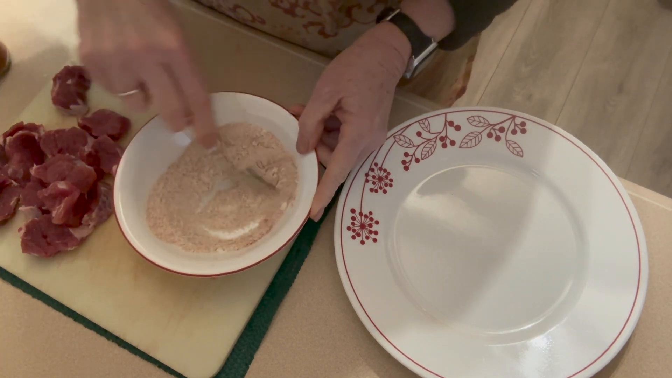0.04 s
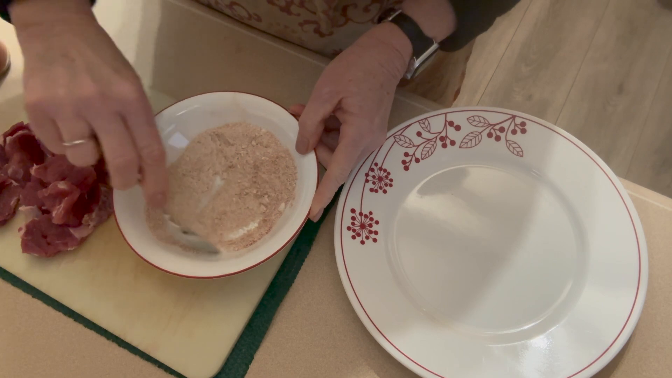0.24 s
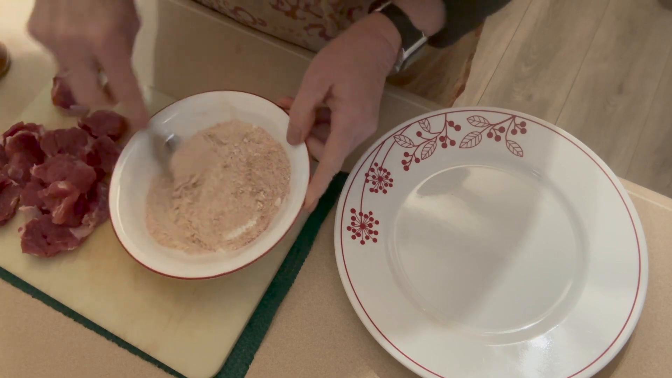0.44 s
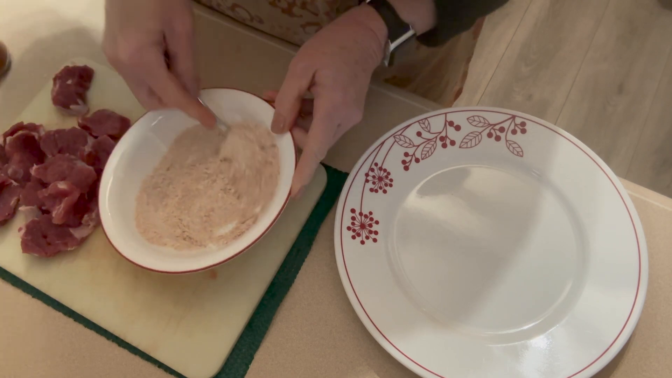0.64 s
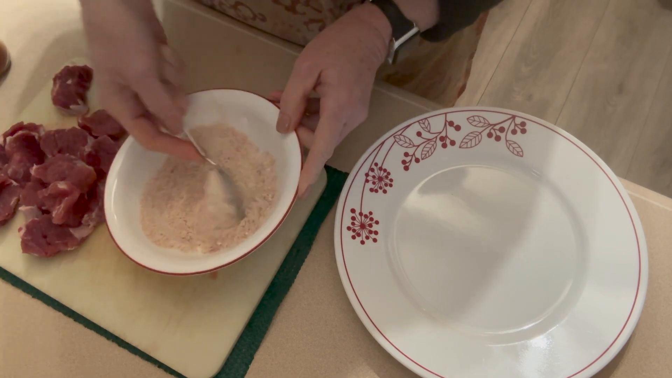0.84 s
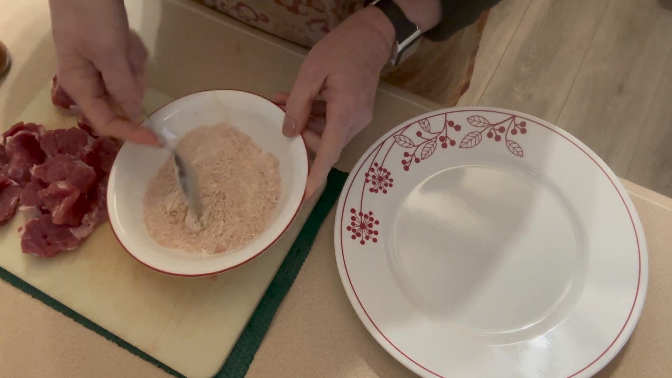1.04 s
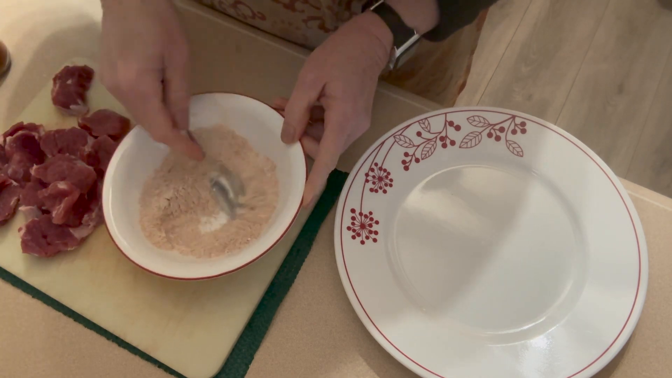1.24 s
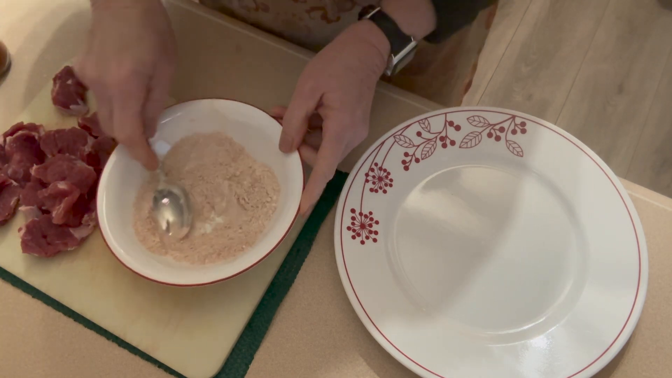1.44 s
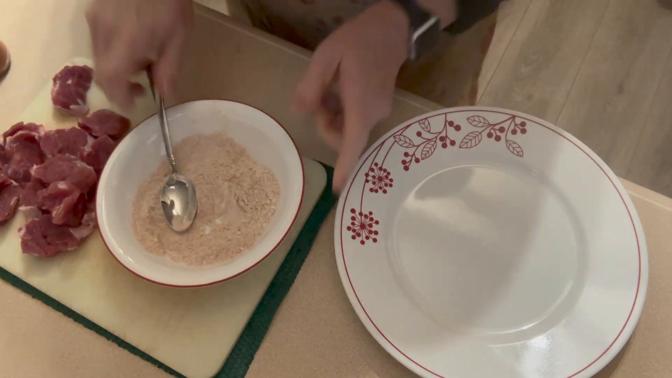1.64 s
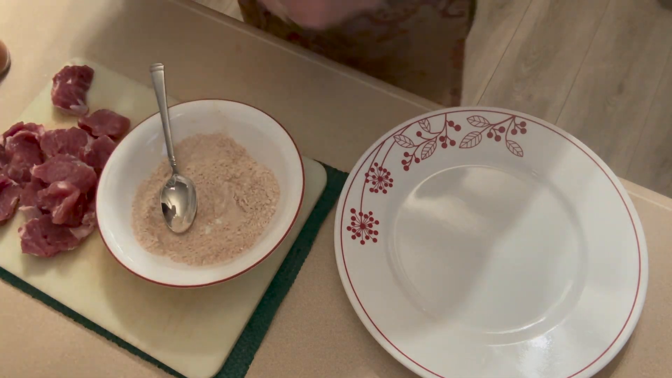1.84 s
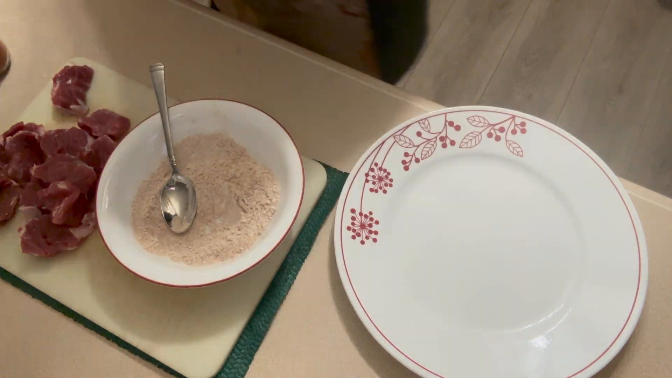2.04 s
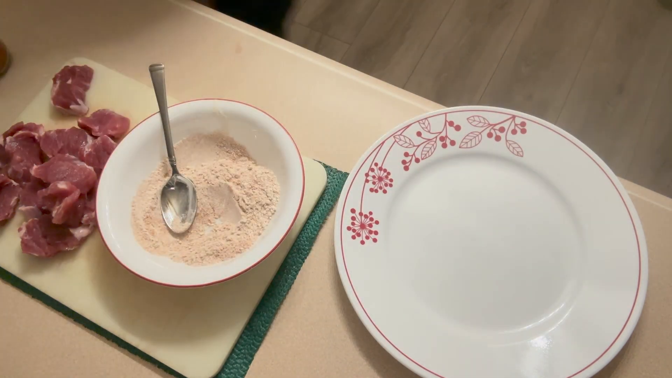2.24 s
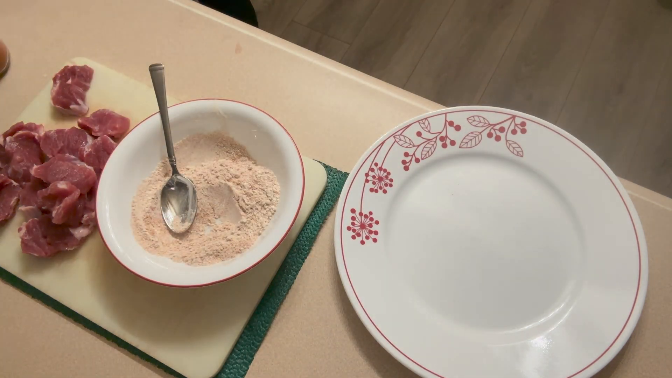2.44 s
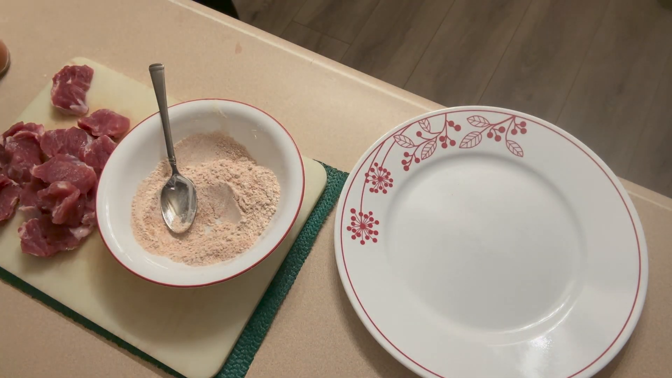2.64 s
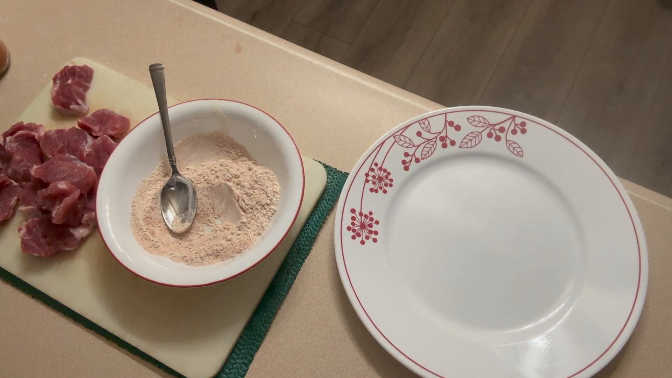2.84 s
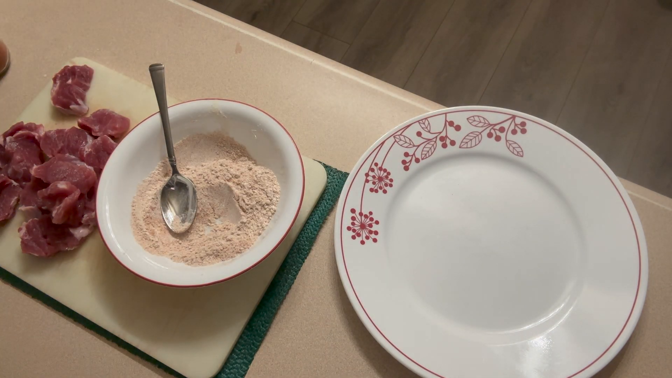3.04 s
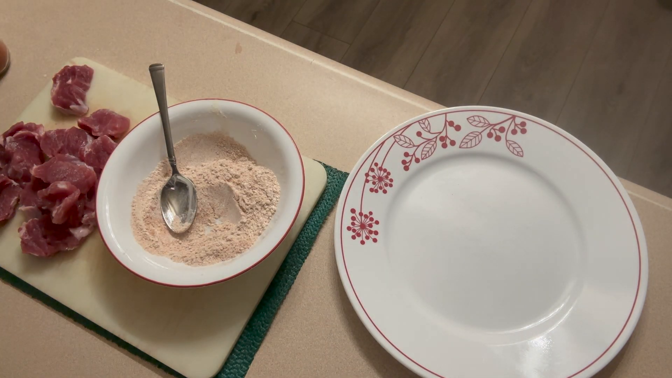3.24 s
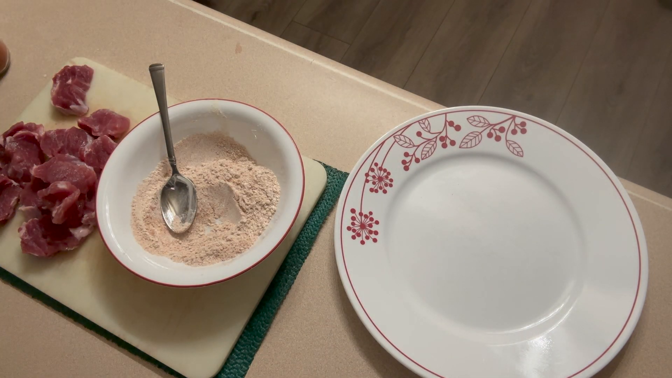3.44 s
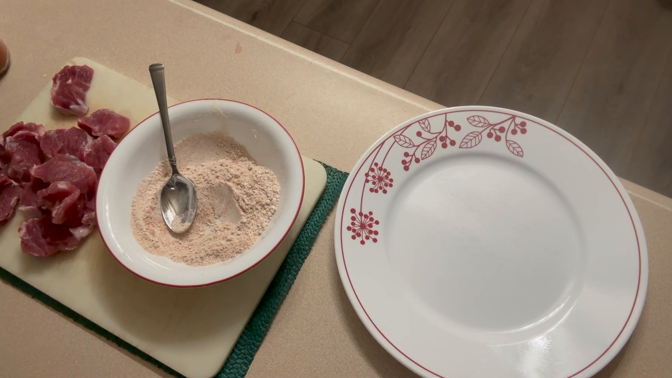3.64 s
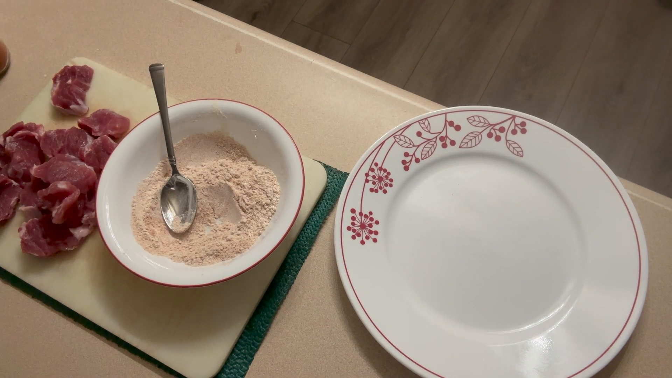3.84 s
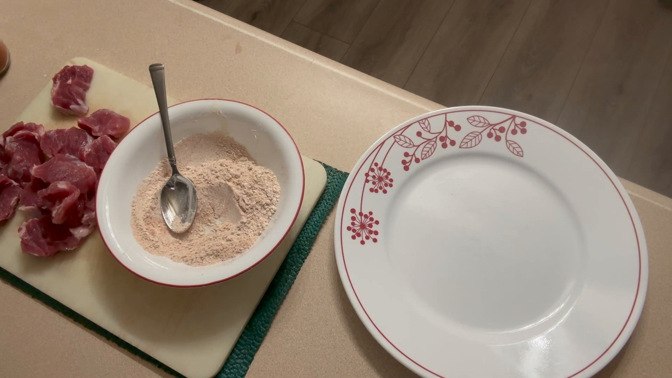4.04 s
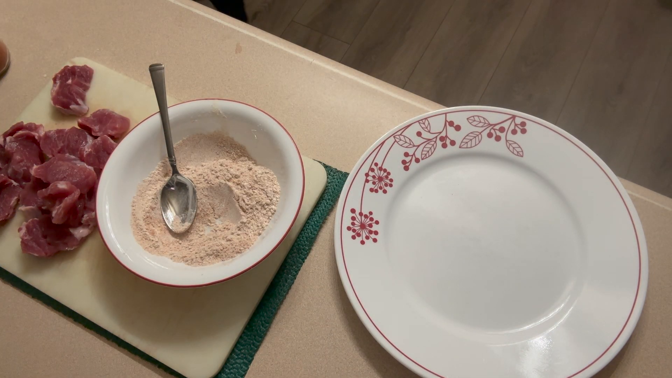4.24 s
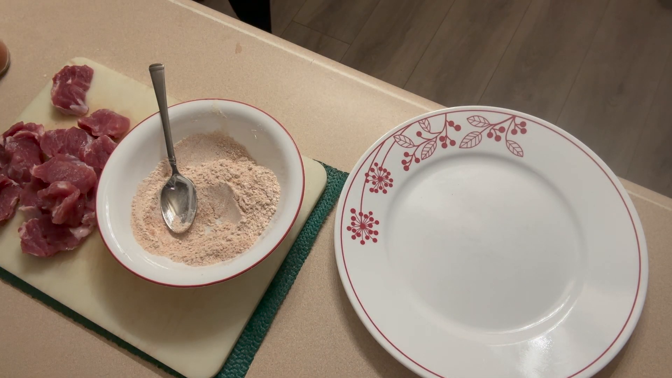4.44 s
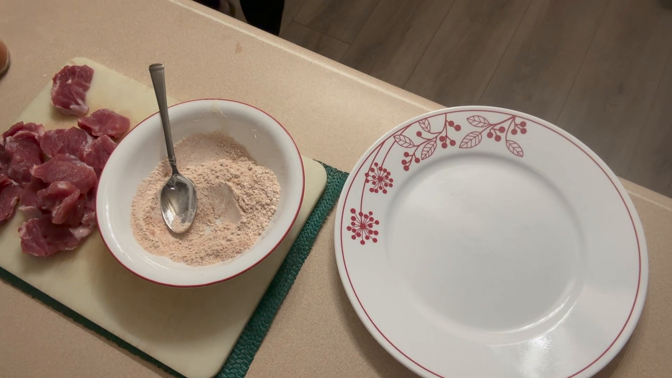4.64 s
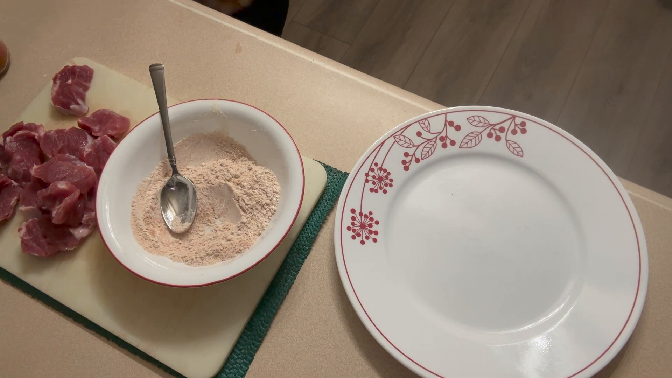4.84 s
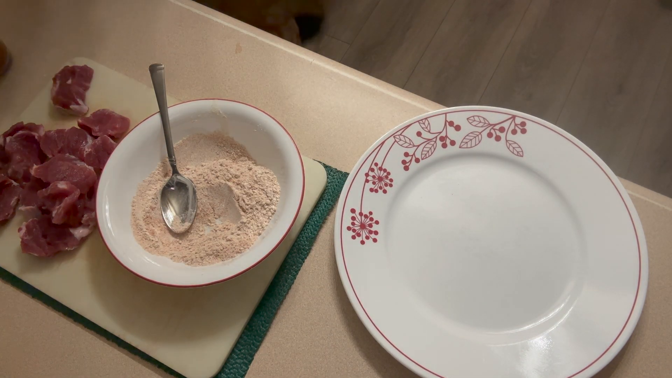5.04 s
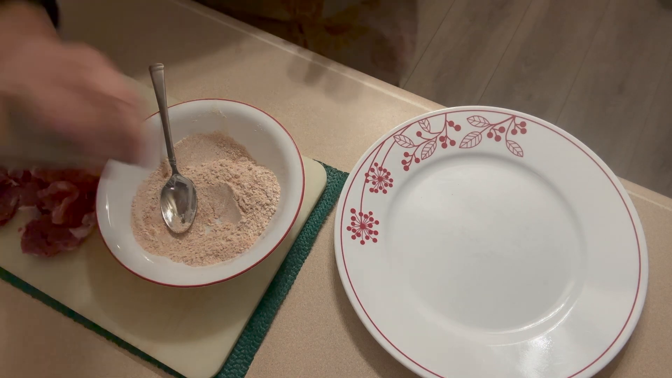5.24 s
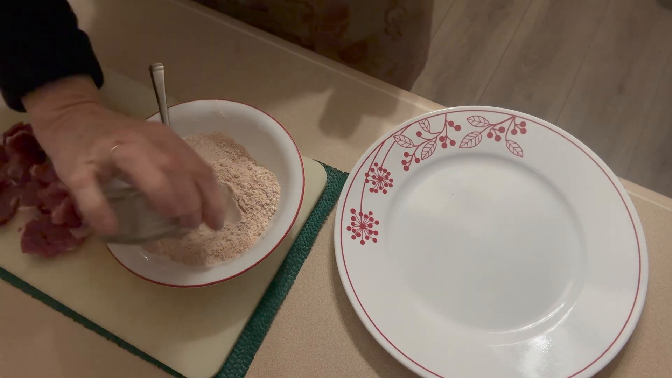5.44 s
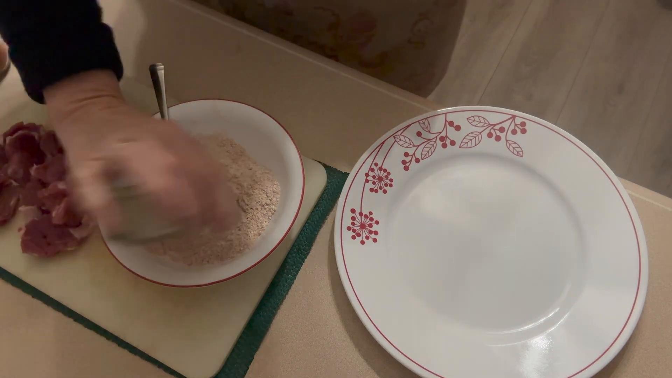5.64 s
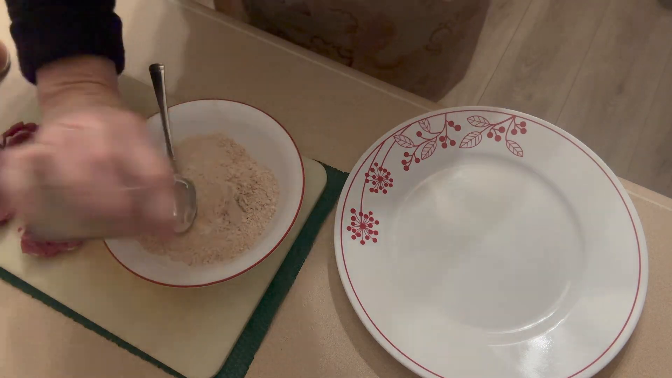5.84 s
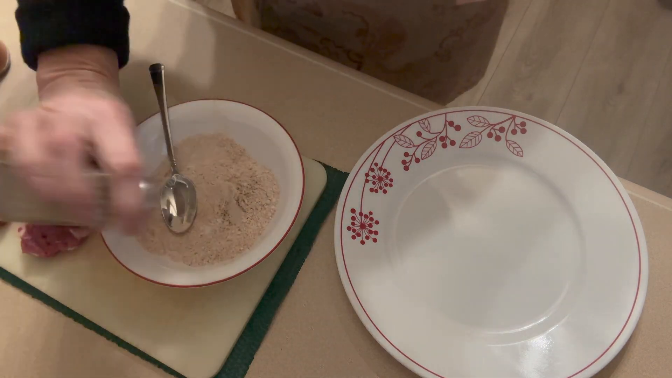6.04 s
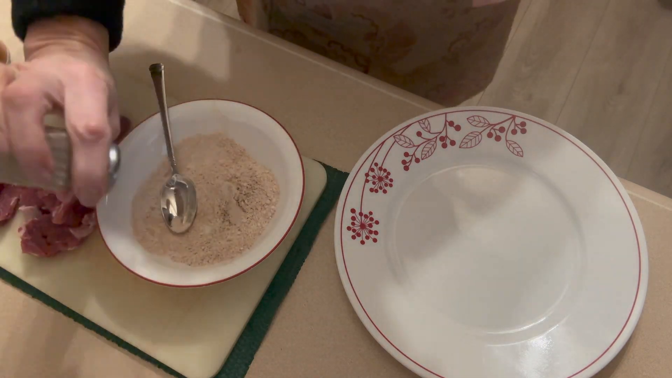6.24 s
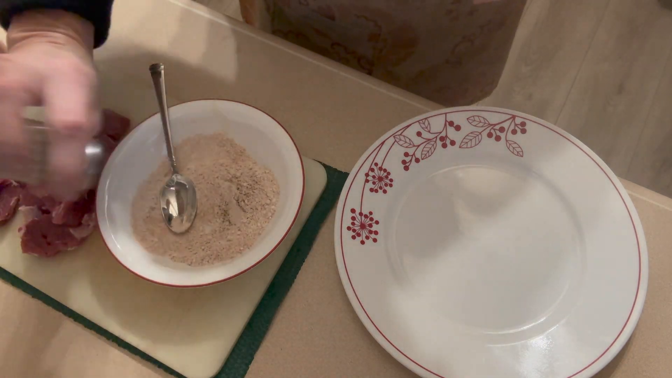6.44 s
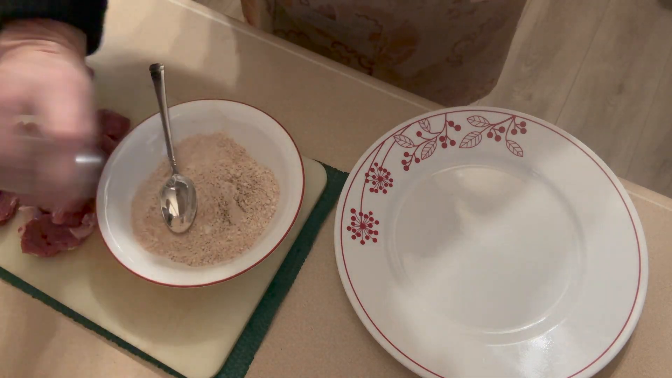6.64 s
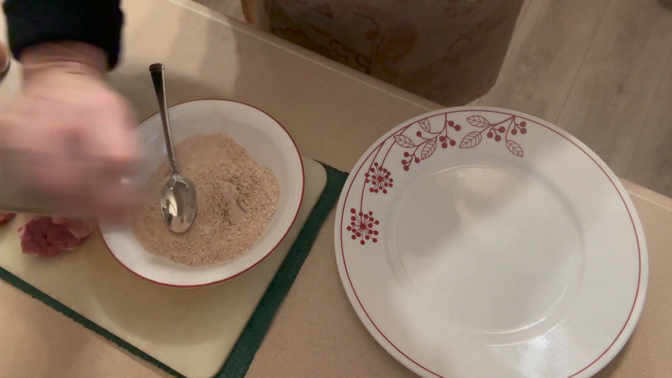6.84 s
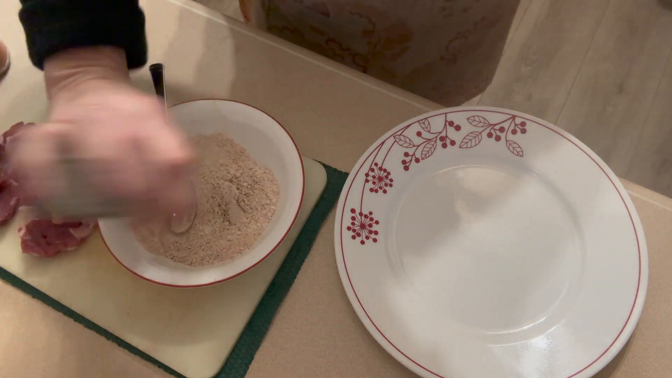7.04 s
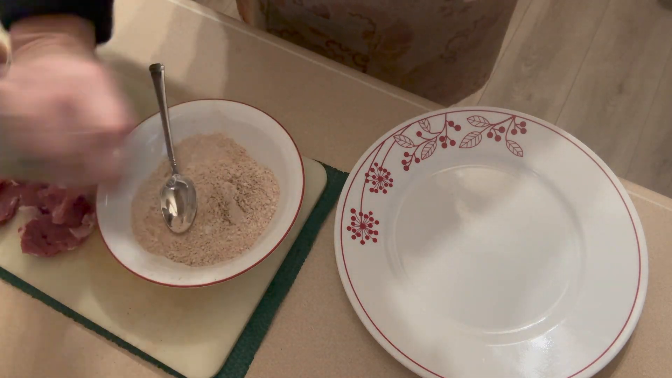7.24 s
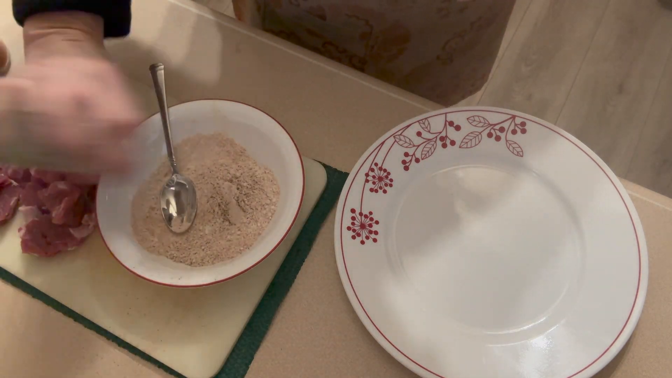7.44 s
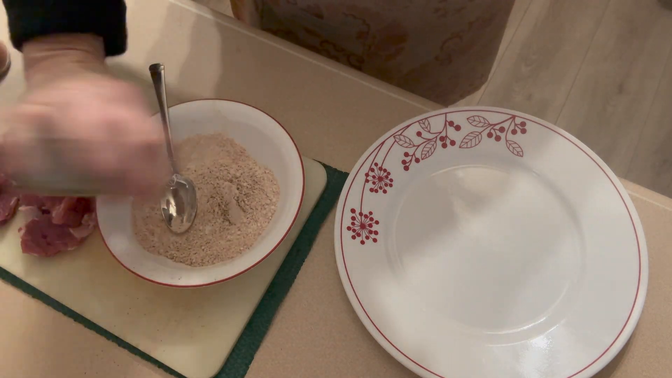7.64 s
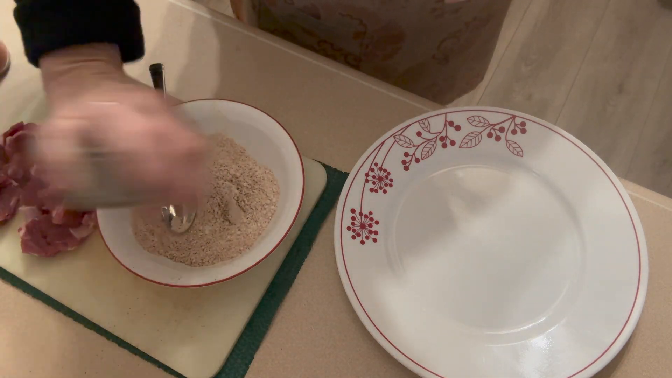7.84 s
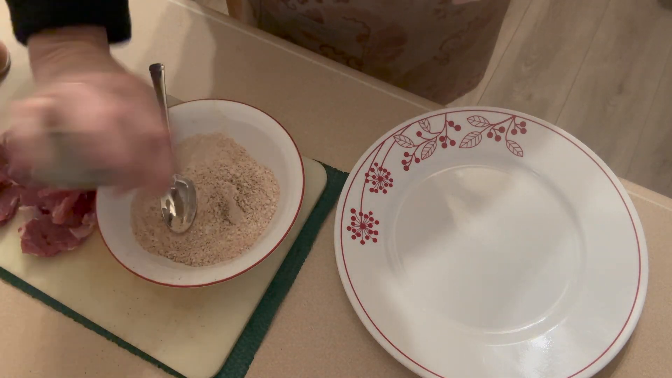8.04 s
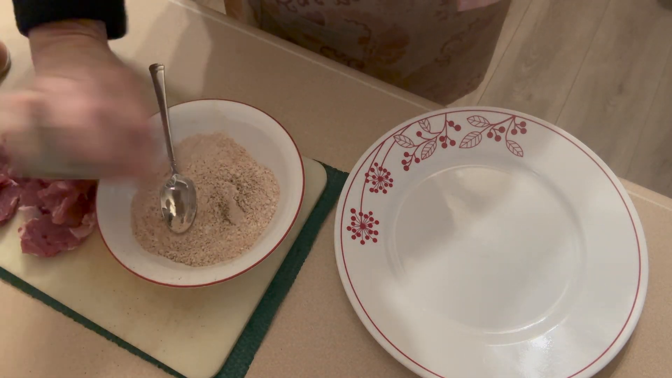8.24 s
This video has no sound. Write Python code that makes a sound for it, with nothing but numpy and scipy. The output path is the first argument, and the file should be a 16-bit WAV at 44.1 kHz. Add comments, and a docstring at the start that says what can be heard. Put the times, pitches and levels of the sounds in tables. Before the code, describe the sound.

In a small home kitchen with a low fridge hum, a spoon hisses through dry flour and clinks on a ceramic bowl, close and slightly left. It drops on the rim with a bright bouncing ring. Clothes rustle and soft steps thud while a jar and cap knock in the distance. Then a spice shaker, near the microphone, is shaken steadily to the end.

```python
"""In a kitchen, a spoon scrapes dry flour round a hand-held bowl, clinks on it and is dropped on the rim.
The cook's clothes rustle and steps thud; a jar and its cap knock across the room, then spice is shaken near by.
Flour, cloth and spice are shaped noise and random grains; bowl, spoon, cap and glass are struck ringing modes;
a fridge hums below it all as broad rumble with narrow noisy drones."""
import sys
import numpy as np
from scipy import signal
from scipy.fft import rfft, irfft
from scipy.io import wavfile

SR = 44100
rng = np.random.default_rng(int(sys.argv[2]) if len(sys.argv) > 2 else 0)


def waveform_to_disk(signal):
    """Save audio, clipped to [-1, 1], as 16-bit WAV at the path in sys.argv[1]."""
    frames = np.transpose(np.atleast_2d(signal))
    scaled = np.clip(frames, -1, 1) * 32767
    samples = np.round(scaled).astype(np.int16)
    wavfile.write(sys.argv[1], SR, samples)


N = 366471


def amp(db):
    """dB to gain."""
    return 10 ** (np.asarray(db) / 20)


def rms_one(x):
    """Scale to rms 1."""
    return x / np.sqrt(np.mean(x ** 2) + 1e-20)


def in_time(rows):
    """A gate that fades within 30 ms beyond the ends of a curve, then its columns at every sample."""
    s, *columns = np.transpose(rows)
    t = np.arange(N) / SR
    gate = np.interp(t, [s[0] - .03, s[0], s[-1], s[-1] + .03], [0, 1, 1, 0])
    return [gate] + [np.interp(t, s, column) for column in columns]


def at_hz(points, hz):
    """Read a spectrum on a log-frequency axis."""
    point_hz, values = np.array(points).T
    return np.interp(np.log(hz), np.log(np.maximum(point_hz, 1)), values)


def swells(rows):
    """One gain curve per row: a straight climb in dB to the peak, a straight fall after it."""
    swell_db = 20   # this far under the peak one rise before and one fall after it
    s, peak_db, rise, fall = np.transpose(rows)[:4, :, None]
    late = np.arange(0, N + 64, 64) / SR - s   # every 64th sample is enough
    return amp(peak_db - swell_db * np.where(late < 0, -late / rise, late / fall))


def spread(coarse):
    """From every 64th sample to every sample."""
    return np.interp(np.arange(N) / 64, np.arange(len(coarse)), coarse)


def strikes(times, heights):
    """A train of single-sample clicks."""
    out = np.full(N, 1e-18)
    np.add.at(out, (np.asarray(times) * SR).astype(int), heights)
    return out


def contacts(hits):
    """Each hit is a short spray of tiny impacts: the sample positions and rows of decaying noise."""
    t = np.arange(SR // 25) / SR
    s, strength_db, long = np.transpose(hits)[:3, :, None]
    spray = rng.standard_normal((len(hits), len(t))) * np.exp(-t / np.maximum(long, 3e-4))
    spray = spray / np.sqrt(np.sum(spray ** 2, 1, keepdims=True))   # same energy at any length
    return (s * SR).astype(int) + np.arange(len(t)), amp(strength_db) * spray


def laid(at, rows):
    """Rows of samples added into one track."""
    return np.bincount(at.ravel(), rows.ravel(), N) + 1e-18


def grains(per_s, spread_db):
    """Random clicks of uneven size; rms 1."""
    sizes = amp(spread_db * np.minimum(rng.exponential(1, N), 5)) * rng.choice([-1, 1], N)
    return rms_one(sizes * (rng.random(N) < per_s / SR))


def ring(x, hz, t60):
    """A decaying sine, set off at height 1 by a unit click."""
    r = amp(-60 / (max(t60, 1e-3) * SR))
    w = 2 * np.pi * hz / SR
    return signal.lfilter([0, np.sin(w)], [1, -2 * r * np.cos(w), r * r], x)


def resonate(x, hz, width_hz):
    """Two-pole resonance with gain 1 on top."""
    r = np.exp(-np.pi * width_hz / SR)
    poles = [1, -2 * r * np.cos(2 * np.pi * hz / SR), r * r]
    return signal.lfilter([(1 - r * r) / 2, 0, (r * r - 1) / 2], poles, x)


def coloured(source, spectrum, bright_db=0):
    """Two unrelated streams to stereo: level and likeness by frequency; brightness tilts about 3 kHz."""
    # How alike left and right are, held within 0 to 1: f/Hz, likeness
    alike_points = [(60, 0.95), (180, 0.8), (550, -0.97), (1650, -0.34), (4970, -1.85), (15000, -3)]
    hz = np.maximum(np.fft.rfftfreq(N, 1 / SR), 1)
    alike = np.clip(at_hz(alike_points, hz), 0, 1)
    mid, side = rfft(source) * amp(at_hz(spectrum, hz)) * np.sqrt([1 + alike, 1 - alike])
    both = rms_one(irfft([mid + side, mid - side], N))
    low = signal.lfilter(*signal.butter(1, 3000, fs=SR), both)
    return low * amp(-bright_db) + (both - low) * amp(bright_db)


def placed(x, pan_db, lag_s, room_db):
    """Direct sound, panned and later on the right, plus the kitchen: a noise tail that dies band by band."""
    # Decay of the room: f/Hz, t60/s
    room_decay = [(500, 0.59), (2000, 0.34), (6000, 0.25), (14000, 0.2)]
    t = np.arange(SR // 2) / SR
    edges = 250 * 2. ** np.arange(0, 6.5, .5)   # half-octave bands
    white, tail = rng.standard_normal((2, len(t))), 0
    for low, high in zip(edges, edges[1:]):
        band = signal.sosfilt(signal.butter(2, [low, high], "band", fs=SR, output="sos"), white)
        tail = tail + band * amp(-60 * t / at_hz(room_decay, np.sqrt(low * high)))
    tail = tail * np.clip(t / 0.0009, 0, 1)   # echoes build up
    tail = tail / np.sqrt(np.sum(tail[0] ** 2))
    wet = signal.fftconvolve(x[None], tail, axes=1)[:, :N]
    late = irfft(rfft(x) * np.exp(-2j * np.pi * np.fft.rfftfreq(N, 1 / SR) * lag_s), N)
    direct = np.array([x * amp(pan_db / 2), late * amp(-pan_db / 2)])
    return direct + amp(room_db) * wet


def fridge():
    """Fridge and house: broad rumble with a few narrow noisy drones, all on one slow level curve."""
    # Course of the hum: t/s, level/dB
    hum_course = [(0.0, -50), (2.8, -50), (5.67, -49), (8.31, -57.5)]
    # Spectrum of the rumble: f/Hz, relative level/dB
    rumble_spectrum = [(15, -47), (25, -14), (48, 1), (127, 0), (223, -1.5), (270, -8), (363, -8.5),
                       (463, -12), (1610, -37.5), (2690, -61.5), (2990, -47), (4740, -48), (6920, -53.5),
                       (12200, -52), (16000, -68)]
    # Drones against the rumble: f/Hz, width/Hz, level/dB
    drone_bands = [(119, 3.7, -8.5), (179, 2.2, -12.5), (367.8, 13, -17), (479.2, 13, -17), (1220, 30, -37),
                   (3430, 72, -35), (9100, 140, -43.5)]
    rumble = coloured(rng.standard_normal((2, N)), rumble_spectrum)
    drones = 0
    for hz, width_hz, db in drone_bands:
        drones = drones + amp(db) * rms_one(resonate(rng.standard_normal(N), hz, width_hz))
    _, level_db = in_time(hum_course)
    return amp(level_db) * (rumble + drones)


def stirring():
    """Flour hisses under the spoon, and its edge catches on the glaze in dense small clicks."""
    # Strokes through the flour: t of the peak/s, level/dB, rise/s, fall/s
    strokes = [(0.005, -72.5, 0.01, 0.11), (.25, -56.5, 0.083, 0.14), (.42, -55.5, 0.16, 0.32),
               (.55, -41, 0.037, 0.05), (.68, -67, .1, 0.23), (.755, -62.5, 0.016, 0.13),
               (1.2, -62, 0.0187, .15), (1.33, -70.5, 0.16, .2), (1.47, -60.5, 0.094, 0.27),
               (1.57, -77.5, 0.027, .06)]
    # Spectrum of the hiss before its tilt: f/Hz, relative level/dB
    flour_spectrum = [(350, -35), (600, -2.5), (2940, -2), (3650, -3.5), (4290, -4.5), (10300, -6),
                      (13700, -19.5), (15000, -54.5)]
    # Held spoon on the bare rim: t/s, strength/dB, crack f/Hz, bowl ring/dB, spoon ring/dB
    rim_hits = [(.192, -9, 3330, -8, -9.5), (.197, -20.5, 3200, -23, -0.5)]
    # Held spoon on the bowl under the flour: t/s, strength/dB, crack f/Hz, bowl ring/dB, spoon ring/dB
    buried_hits = [(0.376, -30.5, 2620, -7, -26), (.384, -25.5, 3230, -35, -11),
                   (0.422, -29, 2820, -31, -11.5), (0.4714, -28, 4800, -12.5, -27),
                   (.488, -36, 3200, -13, -31), (0.516, -47, 3200, -15, -29),
                   (0.5378, -28.5, 3300, -1.5, 3), (0.54, -22, 1490, -33, -1.5),
                   (0.55, -26.5, 3300, -14, -6), (0.564, -38.5, 2400, 4, -22), (.607, -32.5, 1900, -6, -22),
                   (.7465, -30, 3460, -11, -15), (1.207, -28.5, 3150, -14.5, -30),
                   (1.2191, -32.5, 2200, -29, -32), (1.552, -56, 5987, -24, 12.5),
                   (1.566, -63, 5950, -14, 21)]
    bright_db, drag_db = -8.5, -34.5   # tilt of the hiss; glaze clicks below the strokes
    contact_s = .002   # decay of the spray of a held contact
    grip, rim_ring, buried_ring = .15, 0.62, .35   # shares of ring time: spoon in fingers, bowl free, bowl pressed

    push = spread(swells(strokes).sum(0))
    hiss = coloured([grains(9000, 3.0), grains(9000, 3.0)], flour_spectrum, bright_db)
    rim = [(s, db, contact_s, *rest) for s, db, *rest in rim_hits]
    buried = [(s, db, contact_s, *rest) for s, db, *rest in buried_hits]
    drag = push * amp(drag_db) * grains(2000, 4.2)
    return push * hiss, bowl(rim, 0, grip, rim_ring) + bowl(buried, drag, grip, buried_ring)


def bowl(hits, drag, grip, pressed):
    """Each contact cracks and strikes the modes of bowl and spoon; dragging keeps the same modes whispering."""
    # Modes of the bowl: f/Hz
    bowl_hz = [900, 1437, 1698, 1945, 2293, 2735, 3120, 3176, 3370, 4118, 4893, 4955, 5512, 6150, 6944]
    # The same modes: level/dB, t60 before damping/s
    bowl_modes = [(-16.5, .04), (-7.5, .07), (-6, .1), (-7, .07), (-12, .08), (-9.5, .08), (-4, .19),
                  (-1.5, .22), (-5.5, .14), (-13, .1), (-7.5, .2), (-5, .22), (-11, .12), (-10.5, .08),
                  (-11.5, .2)]
    # Modes of the spoon: f/Hz
    spoon_hz = [7800, 7959, 8554, 8627, 8966, 9410, 9464, 10250, 10508, 10575, 11905, 13178, 15084, 15159]
    # The same modes: level/dB, t60 before damping/s
    spoon_modes = [(-11, .09), (-2, .1), (-8, .12), (-7, .12), (-8, .12), (0, .12), (-3, .12), (-9, .07),
                   (-6, .1), (-1, .11), (-7, .1), (-6, .09), (-4, .07), (-7, .07)]
    reach_db = 3.5   # bowl modes are struck this much less per octave away from the crack

    at, spray = contacts(hits)
    s, strength_db, _, crack_hz, bowl_db, spoon_db = np.transpose(hits)
    cracks = [resonate(resonate(row, hz, .8 * hz), hz, .8 * hz) for row, hz in zip(spray, crack_hz)]
    board = resonate(laid(at, spray), 700, 820)   # the blow passes into the board under the bowl
    out = amp(24.0) * laid(at, np.array(cracks)) + amp(13.5) * board
    for k, (hz, (level_db, t60)) in enumerate(zip(bowl_hz, bowl_modes)):
        octaves = np.abs(np.log2(hz / crack_hz))
        on_bowl = strikes(s, amp(strength_db + bowl_db - reach_db * octaves)) + drag
        out += (-1) ** k * amp(level_db) * ring(on_bowl, hz, pressed * t60)   # neighbours in opposition
    on_spoon = strikes(s, amp(strength_db + spoon_db - 5.5)) + drag
    for k, (hz, (level_db, t60)) in enumerate(zip(spoon_hz, spoon_modes)):
        out += (-1) ** k * amp(level_db) * ring(on_spoon, hz, grip * t60)
    # keeps the summed modes from adding bass below the ringing
    return signal.lfilter(*signal.butter(2, 300, "high", fs=SR), out)


def cook():
    """Cloth and slippers rustle as swelling noise; heels and soles thud as low decaying sines."""
    # Moves: t of the peak/s, level/dB, rise/s, fall/s, brightness/dB
    gestures = [(2.05, -68, 0.63, 1, -2.5), (2.299, -55.5, 0.064, 0.13, 7.5), (2.81, -56, .3, 0.34, 1),
                (3.42, -53.5, .15, 0.2, -3.5), (3.655, -58.5, 0.043, 0.14, 0),
                (3.84, -64.5, 0.16, 0.078, 3), (4.408, -42.5, 0.058, 0.11, 10),
                (4.68, -58.5, 0.39, 0.45, 4.5), (4.912, -57, 0.0083, 0.42, 11.5),
                (5.06, -67.5, 0.097, 0.6, -13.5), (5.3, -70.5, 0.18, 0.091, -5),
                (5.415, -52.5, 0.0089, 0.17, 15)]
    # Spectrum of the rustle before its tilt: f/Hz, relative level/dB
    rustle_spectrum = [(290, -19.5), (500, 0.5), (1370, -13), (2640, -14.5), (2920, -17), (9510, -31),
                       (13200, -34.5), (15000, -47.5)]
    # Heels and soles before the low-pass: t/s, level/dB, f/Hz, t60/s
    footfalls = [(2.782, -34.5, 45.5, 0.37), (3.683, -40.5, 46.7, 0.25), (4.906, -33, 200, 0.046),
                 (5.013, -28, 60.4, 0.042), (5.036, -30, 147, 0.028), (5.06, -31, 100, .05),
                 (5.11, -33, 68.8, .05), (5.172, -41, 60, 0.055), (5.41, -33, 300, .06),
                 (5.427, -42.5, 55, 0.28)]
    moves = swells(gestures) + 1e-9
    bright_db = spread(np.transpose(gestures)[-1] @ moves / moves.sum(0))   # the louder move decides
    rustle = spread(moves.sum(0)) * coloured(rng.standard_normal((2, N)), rustle_spectrum, bright_db)
    thuds = sum(ring(strikes([s], amp(db)), hz, t60) for s, db, hz, t60 in footfalls)
    return rustle + signal.lfilter(*signal.butter(2, 250, fs=SR), thuds)


def jar():
    """Knocks are hollow rattles over a thud and a ring of the cap; thread clicks crack, touched glass rings."""
    # Glass touches glass: t/s, strength/dB
    glass_hits = [(3.1473, -66.5)]
    # Modes of the glass: f/Hz, level/dB, t60/s
    glass_modes = [(3736, 0, 0.1), (4495, -14, 0.24), (6137, -9, 0.14), (8021, -8, 0.13), (9189, -13, 0.35),
                   (9781, -16, 0.28), (11270, -4, 0.15)]
    # Knocks: t/s, strength/dB, rattle decay/s, body f/Hz, body width/Hz, thud/dB, cap ring/dB
    knocks = [(3.2572, -44, 0.005, 1846, 1825, -7, -45.5), (3.3247, -29, 0.0019, 2300, 1800, -32, -34.5),
              (3.354, -29, 0.013, 2130, 2000, -5, -26), (3.4, -24, 0.023, 1680, 1600, -18, -31),
              (3.4184, -26, 0.0079, 2400, 2200, -8, -21), (3.6376, -48.5, 0.0021, 2910, 1500, -10.5, -22.5),
              (4.2432, -45, 0.0021, 1266, 1000, -7.5, -44), (4.357, -25, 0.0024, 2260, 2000, -22, -21.5),
              (4.368, -33, .001, 3320, 3000, -25, -35), (4.378, -10, 0.00064, 2780, 4000, -23, -26),
              (4.3854, -8, 0.0015, 2600, 2600, -8, -43), (4.456, -18, .004, 2600, 3000, -9, -27),
              (4.513, -15, 0.0082, 2960, 2400, -8.5, -29), (4.7224, -16, 0.0012, 3390, 2010, -29, -40),
              (4.727, -11.5, .002, 3300, 2000, -31, -47.5), (5.1216, -40, .004, 1290, 700, -15, -40),
              (5.198, -42, 0.0028, 1830, 900, -15, -43)]
    # Modes of the cap: f/Hz, level/dB, t60/s
    cap_modes = [(8100, -6, .025), (8700, -3, .03), (9140, 0, .04), (11800, -10, .025)]
    # Cap clicks on its thread: t/s, strength/dB
    thread_clicks = [(4.378, -51), (4.4575, -42), (4.6292, -20.5), (4.637, -38), (4.645, -38), (4.7, -31)]
    thud_hz, thud_width_hz = 1350, 760
    click_s = .001   # decay of the spray of a click

    s, strength_db, _, hz, width_hz, thud_db, cap_db = np.transpose(knocks)
    at, spray = contacts(knocks)
    body = np.array([resonate(resonate(row, f, w), f, w) for row, f, w in zip(spray, hz, width_hz)])
    body = body * np.sqrt(SR / width_hz)[:, None]   # make up for the loss in a narrow body
    thud = resonate(laid(at, spray * amp(thud_db)[:, None]), thud_hz, thud_width_hz)
    thud = thud * np.sqrt(SR / thud_width_hz)
    clicks = [(click_at, db, click_s) for click_at, db in thread_clicks]
    crack = resonate(laid(*contacts(clicks)), 10700, 3900)
    cap = sum(ring(strikes(s, amp(strength_db + cap_db + db)), f, t60) for f, db, t60 in cap_modes)
    s, strength_db = np.transpose(glass_hits)
    glass = sum(ring(strikes(s, amp(strength_db + db)), f, t60) for f, db, t60 in glass_modes)
    return laid(at, body) + thud + crack + cap + glass


def shaker():
    """Sliding grains swell and land in a burst against the pierced end, all through the shaker's resonances."""
    # Spice trickling inside: t/s, level/dB
    trickle_course = [(5.2, -88.5), (5.35, -53), (5.6, -65.5), (5.7, -65), (8.31, -60)]
    # Throws: t/s, landing/dB, swish of the fall back/dB
    shakes = [(5.298, -29.5, -68), (5.5991, -49.5, -66), (5.7998, -49, -58), (5.992, -44.5, -60.5),
              (6.171, -40.5, -63), (6.3493, -42.5, -59.5), (6.548, -36, -60.5), (6.7455, -36, -57),
              (6.935, -41.5, -58.5), (7.118, -41.5, -59), (7.3248, -38.5, -54.5), (7.503, -38.5, -50),
              (7.701, -36.5, -52), (7.9081, -36.5, -56), (8.1191, -34, -52.5)]
    # Resonances of the shaker: f/Hz, width/Hz, level/dB
    resonances = [(2300, 700, -7), (2650, 200, 1), (3430, 200, -9), (4860, 350, -4), (8700, 1800, -18),
                  (12400, 1300, -10)]
    # Narrow modes in which sliding grains sing: f/Hz, width/Hz, level/dB
    singing_modes = [(2760, 27, 1.5), (5070, 330, -4.5), (8370, 295, -9), (11240, 250, -8),
                     (12730, 390, -3.5)]
    landing_s, return_s = 0.0096, 0.12   # decay of a landing; the spice falls back this long after the throw
    swish_s, throw_swish_db = 0.041, -52.5   # rise and level of the swish before a landing
    swish_tilt_db, trickle_tilt_db = 6, 4   # brightness per octave
    clumps_per_s, clumpy_db = 40, 5   # the grains slide in clumps

    t = np.arange(N) / SR
    burst = swish = 0
    throws = [(s, landing_db, throw_swish_db) for s, landing_db, _ in shakes]
    returns = [(s + return_s, -np.inf, back_db) for s, _, back_db in shakes]   # no landing
    for s, landing_db, swish_db in throws + returns:
        late = t - s - .002
        landing = np.exp(-np.abs(late) / np.where(late > 0, landing_s, 0.35 * landing_s))
        burst = burst + amp(landing_db) * landing
        swish = swish + amp(swish_db) * np.exp(-(late / np.where(late > 0, .025, swish_s)) ** 2)
    thrown = burst * grains(12000, 3.4)
    sliding = swish * grains(8000, 3.5)
    gate, trickle_db = in_time(trickle_course)
    trickle = gate * amp(trickle_db) * grains(8000, 2.6)
    out = 0
    for k, (hz, width_hz, db) in enumerate(resonances):
        octaves = np.log2(hz / 12000)   # light grains reach the high resonances best
        drive = thrown + amp(swish_tilt_db * octaves) * sliding + amp(trickle_tilt_db * octaves) * trickle
        out = out + (-1) ** k * amp(db) * resonate(drive, hz, width_hz)
    for hz, width_hz, db in singing_modes:
        clumps = np.interp(t * clumps_per_s, np.arange(1000), rng.standard_normal(1000))
        out = out + amp(db) * resonate(sliding * amp(clumpy_db * clumps), hz, width_hz)
    return out


def scene():
    """Bowl and shaker are near and off to one side, the jar is across the room."""
    # Dropped spoon bouncing on the rim: t/s, strength/dB, contact decay/s, crack f/Hz, bowl ring/dB, spoon ring/dB
    bounces = [(1.6277, -8, 0.002, 4070, -7.5, -0.5), (1.6411, -12, 0.0088, 3470, -1, -5.5),
               (1.6546, -29.5, 0.006, 3500, -5, 12), (1.6633, -16.5, 0.01, 3530, -1, -2.5)]
    near_pan_db, far_pan_db, lag_s = -4.5, -4, 0.0001   # left over right; delay of the right
    bowl_room_db, shaker_room_db, jar_room_db = -7.5, -9, 5

    hum = fridge()
    flour, clinks = stirring()
    dropped = bowl(bounces, 0, 0.54, 0.48)   # let go, the spoon rings longer
    near = placed(clinks + dropped, near_pan_db, lag_s, bowl_room_db)
    far = placed(jar(), far_pan_db, 0, jar_room_db)
    spice = placed(shaker(), near_pan_db, lag_s, shaker_room_db)
    return hum + flour + near + cook() + far + spice


def record(dry):
    """The deepest bass and the top are cut."""
    dry = signal.sosfilt(signal.butter(2, 30, "high", fs=SR, output="sos"), dry)
    return signal.sosfilt(signal.cheby2(12, 70, 16500, fs=SR, output="sos"), dry)


dry = scene()
out = record(dry)
waveform_to_disk(out)
```